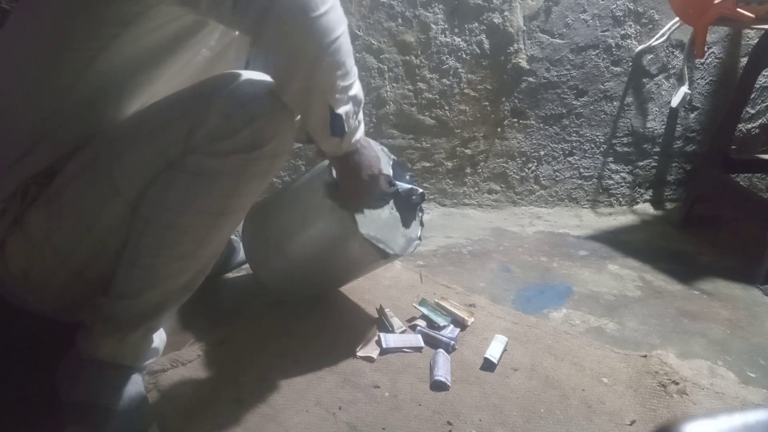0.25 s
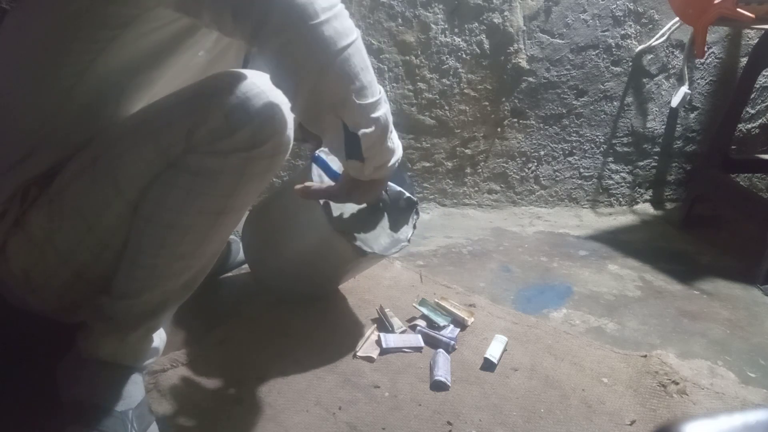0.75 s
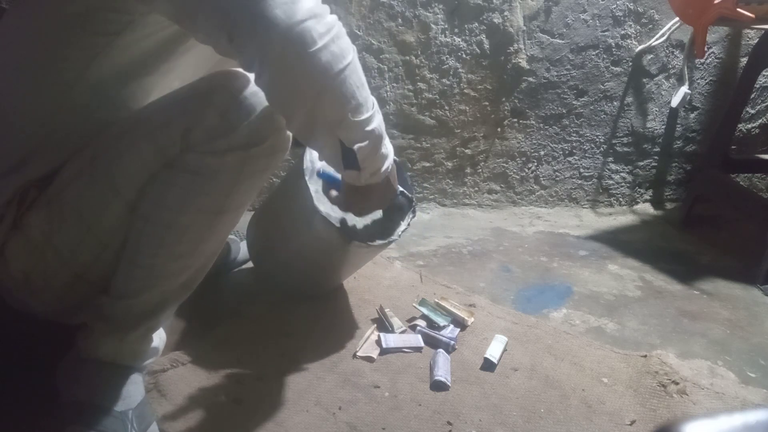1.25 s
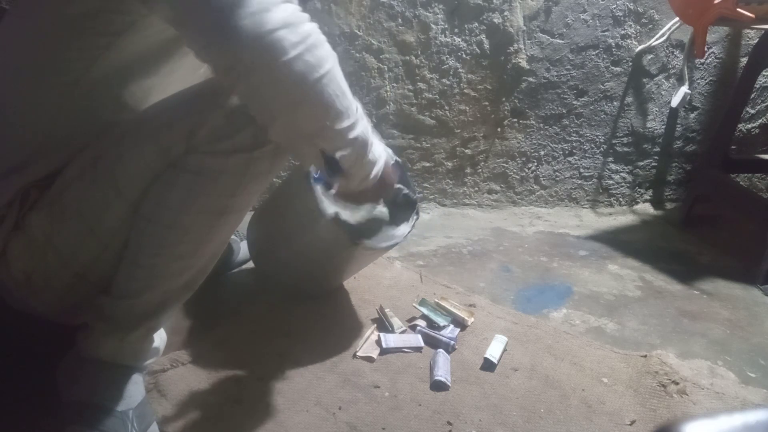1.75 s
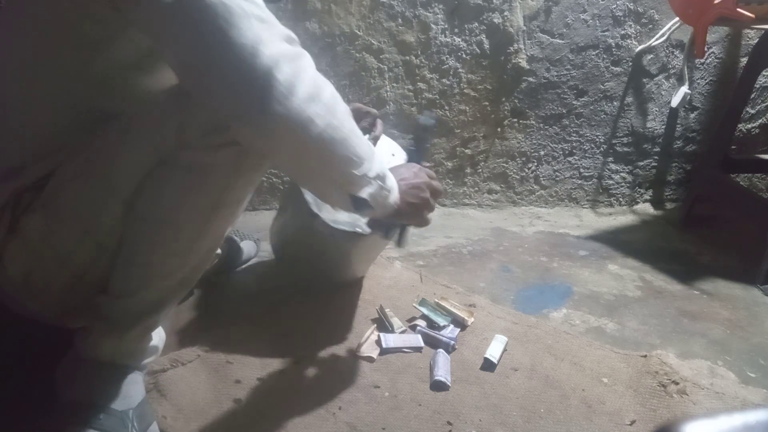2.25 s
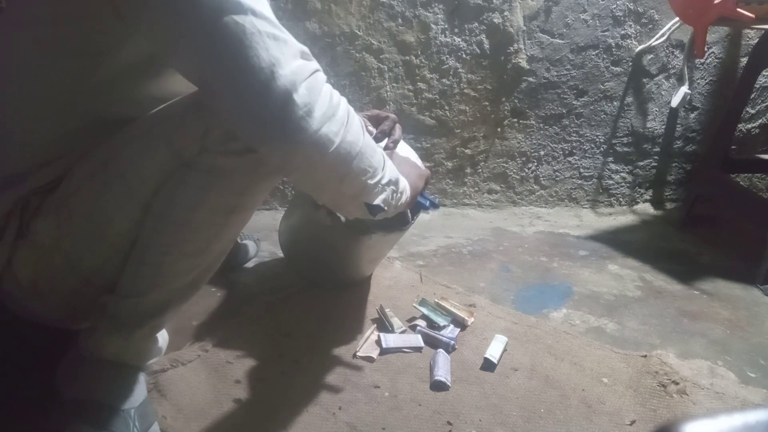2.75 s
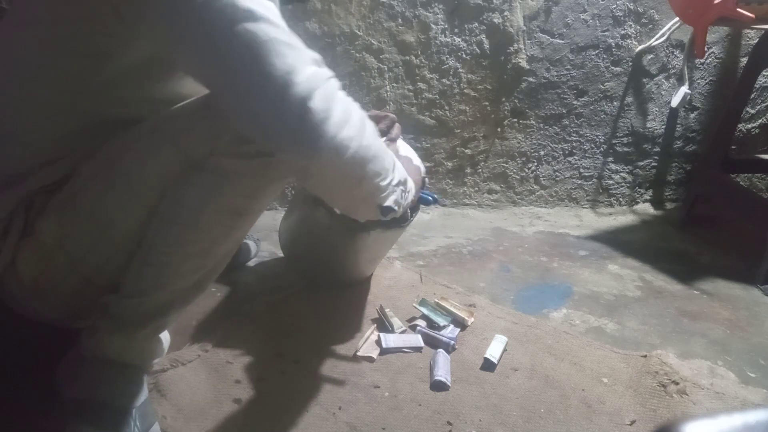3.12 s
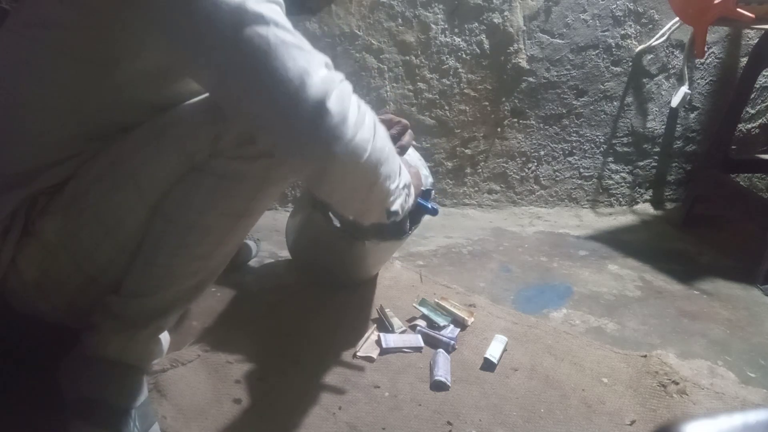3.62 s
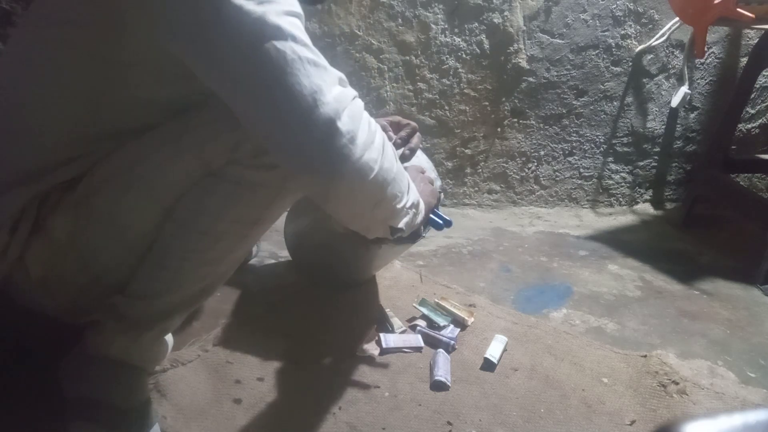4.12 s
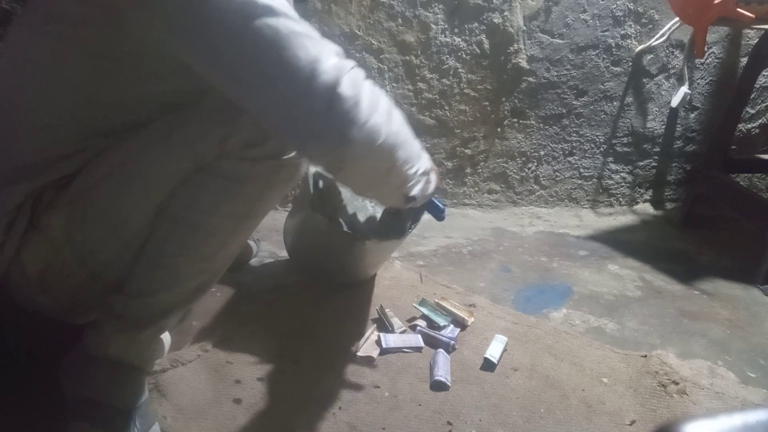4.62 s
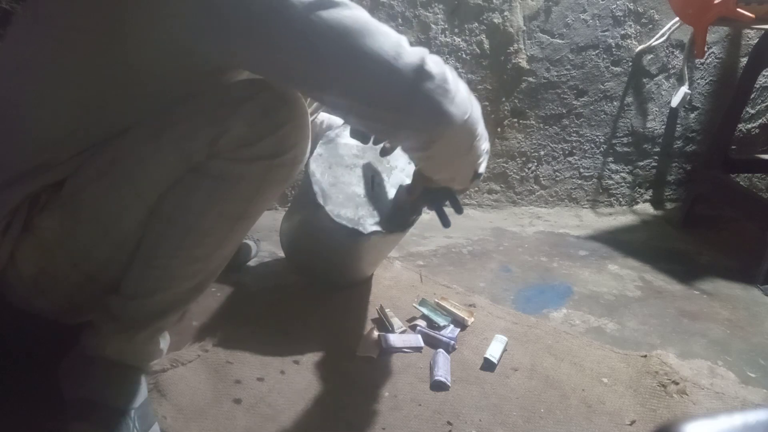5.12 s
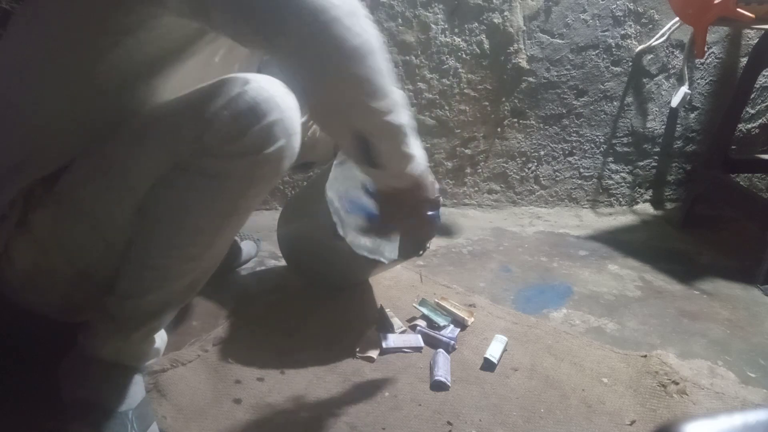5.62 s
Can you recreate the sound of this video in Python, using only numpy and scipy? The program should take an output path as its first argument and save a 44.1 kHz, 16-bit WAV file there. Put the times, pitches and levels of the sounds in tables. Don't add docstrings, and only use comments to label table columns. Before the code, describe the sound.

Close phone capture of a hollow sheet-metal container being worked with a hand tool. Small knocks and tinny ticks come first, then harsh buckling and loud clanking, then long quiet gaps with small scrapes and low thumps. A sudden booming clank arrives late, followed by a few faint knocks. Hard walls reflect at once, and a distant fan rushes softly throughout.

```python
import sys
import numpy as np
from scipy import signal
from scipy.fft import rfft, irfft, next_fast_len
from scipy.io import wavfile
from scipy.ndimage import uniform_filter1d, map_coordinates

SR = 44100
rng = np.random.default_rng(int(sys.argv[2]) if len(sys.argv) > 2 else 0)


def output_pcm(signal):
    pcm = np.clip(np.atleast_2d(signal).T, -1, 1) * 32767
    wavfile.write(sys.argv[1], SR, np.round(pcm).astype(np.int16))


def ratio_of_db(decibels):
    return 10 ** (np.asarray(decibels, float) / 20)


N = 258867


def unit(x):
    return x / np.sqrt(np.mean(x ** 2) + 1e-20)


def along(points, hz):
    f, v = np.transpose(points)
    return np.interp(np.log(hz + 1), np.log(f + 1), v)


def filtered(x, response):
    m = next_fast_len(N + 8192)
    spectrum = rfft(x, m) * response(np.fft.rfftfreq(m, 1 / SR))
    return irfft(spectrum, m)[..., :N]


def wobble(rate):
    knots = rng.standard_normal(N // 500)
    return map_coordinates(knots, [np.arange(N) * rate / SR])


def rings(hz, t60, strengths, cycles):
    t = np.arange(SR // 3) / SR
    hz, t60 = hz[:, None], t60[:, None]
    swell = 1 - np.exp(-t * hz / cycles)
    modes = ratio_of_db(-60 * t / t60) * swell * np.exp(2j * np.pi * hz * t)
    return (strengths @ modes).imag


def chance(events, count, scatter_db):
    draw = rng.standard_normal((events, 2, count))
    return ratio_of_db(scatter_db * draw[:, 0]) * np.exp(4j * draw[:, 1])


def place(times, sounds):
    out = np.zeros(N + SR)
    for s, sound in zip(times, sounds):
        out[round(s * SR):][:len(sound)] += sound
    return out[:N]


def lid_events():
    # start_s, peak_db, bright_db, clank_db, clank_hz
    snaps = np.array([(.526, -42.5, -12.5, 3, 635), (0.6228, -32, -14, -4, 784),
                      (0.6653, -32.5, -17, -9, 1590), (.84, -41.5, -9.5, 10.5, 786),
                      (1.0098, -41.5, -7, -8, 1200), (1.369, -25, -12, 0.5, 810),
                      (1.7474, -25, -14.5, -5.5, 1300), (1.832, -32.5, -9, 13.5, 900),
                      (1.8443, -17.5, -7.5, 4, 950), (1.8942, -21, -21, -15.5, 950),
                      (2.4555, -46.5, -13, 13.5, 1114), (3.2256, -48, -24, 10.5, 620),
                      (3.272, -30.5, -15, 4.5, 693), (3.63, -43.5, -18, -2.5, 750),
                      (3.7224, -52.5, -22, 8.5, 1570), (4.2187, -41, -13, 5, 1104),
                      (4.6678, -29, -18, 12, 834), (4.685, -42.5, -30.5, 17.5, 870),
                      (5.1004, -34, -11, -4, 1130)])
    # start_s, peak_db, clank_db, clank_hz
    bends = np.array([(0.5741, -42.5, -1, 1200), (.64, -33.5, -2.5, 775), (.688, -43, 4, 1550),
                      (.856, -40, 1, 894), (0.8787, -35.5, -16, 830), (1.815, -26, 10.5, 930),
                      (1.059, -40, 0.5, 1200), (1.385, -22.5, 3, 796), (1.43, -23.5, -1.5, 790),
                      (1.4647, -24, -10, 1150), (1.4806, -20.5, -23, 1170), (1.5035, -23.5, -2.5, 990),
                      (1.5233, -28.5, -1, 732), (1.76, -26.5, 4.5, 774), (1.776, -28.5, 5, 910),
                      (1.8599, -14, -3, 950), (2.5598, -42.5, -7, 1170), (2.5876, -52.5, 12, 870),
                      (2.641, -46, 6, 1160), (3.2375, -47.5, 16.5, 640), (3.284, -34, 1, 1510),
                      (3.311, -35, 4, 1520), (3.3279, -36, -9, 760), (3.3608, -50, -2, 662),
                      (3.668, -47, 7, 1710), (4.2496, -44.5, 3, 776), (4.70, -41, 11, 1250),
                      (4.7194, -59, 16, 869), (5.1293, -37, 5, 964), (5.1485, -42, 8, 1187)])
    snap_rise_s, bend_rise_s = 0.0024, 0.0055
    duller_db = -5.5
    before = np.searchsorted(snaps[:, 0], bends[:, 0]) - 1
    bends = np.insert(bends, 2, snaps[before, 2] + duller_db, axis=1)
    rise = np.repeat([snap_rise_s, bend_rise_s], [len(snaps), len(bends)])
    return np.column_stack([np.vstack([snaps, bends]), rise])


def lid():
    # mode_hz, level_db, t60_s
    lid_modes = [(654.5, 5.5, 0.19), (735, 9, 0.066), (771.3, 4.5, 0.13), (858.5, 5.5, 0.17),
                 (936, 1, 0.24), (990, -2, 0.17), (990, -18.5, 0.065), (1172, -10, 0.15),
                 (1260, -0.5, 0.067), (1212, 8.5, 0.072), (1342, 11, 0.23), (1355, 8, 0.061),
                 (1510, 0.5, 0.21), (1544, 13, 0.047), (1734, -1, 0.15), (1782, -6.5, 0.13),
                 (1810, -22.5, 0.12), (1980, -17, .14), (2305, -28.5, .14), (2800, -6, .12)]
    # hz, level_db
    sheet_colour = [(100, -29), (300, -3), (550, -5), (800, 1), (1200, 2), (2000, -4.5), (3000, -0.5),
                    (4500, 0), (6500, 1), (8500, -3), (12000, -30)]
    # hz, t60_s
    sheet_decay = [(500, 0.14), (2000, 0.17), (4000, 0.15), (8000, 0.093)]
    s, db, bright_db, clank_db, clank_hz, rise = np.transpose(lid_events())[:, :, None]

    hz, level, t60 = np.transpose(lid_modes)
    near = np.exp(-.5 * (np.log2(hz / clank_hz) / 0.1) ** 2) + 0.15
    strengths = ratio_of_db(clank_db + level - 4.0) * near
    strengths = strengths * chance(len(s), count=len(hz), scatter_db=2.0)
    clank = rings(hz, np.minimum(t60, .15), strengths, cycles=0.89)

    f, frame, z = signal.stft(rng.standard_normal(clank.shape), SR, nperseg=512)
    tilt_octaves = np.log2(np.maximum(f, 2000) / 2800)
    colour_db = along(sheet_colour, f) + (bright_db + 4.5) * tilt_octaves
    colour_db += 0.54 * clank_db / (1 + (f / 1800) ** 4)
    streaks_db = 1.43 * rng.standard_normal(colour_db.shape)
    dying = ratio_of_db(-60 * frame / along(sheet_decay, f)[:, None])
    z = z * ratio_of_db(colour_db + streaks_db)[:, :, None] * dying
    crash = signal.istft(z, SR, nperseg=512)[1][:, :clank.shape[1]]

    t = np.arange(clank.shape[1]) / SR
    swell = 1 - np.exp(-t / rise)
    rattle = ratio_of_db(1.2 * wobble(120))
    return rattle * place(s[:, 0], ratio_of_db(db) * swell * (clank + ratio_of_db(6.0) * crash))


def body_events():
    # start_s, peak_db, wall_hz
    taps = [(0.173, -28, 360), (0.245, -28.5, 353), (0.534, -25.5, 395), (0.572, -27.5, 440),
            (0.632, -27.5, 300), (0.685, -35, 324), (0.766, -22.5, 308), (0.801, -22.5, 363),
            (0.846, -21, 352), (0.879, -27, 360), (1.057, -30.5, 298), (1.371, -11.5, 310),
            (1.483, -14.5, 310), (1.40, -32, 324), (1.504, -18, 306), (1.52, -19, 352), (1.756, -17.5, 308),
            (1.8, -16, 315), (2.478, -36.5, 390), (2.556, -35, 370), (2.59, -29.5, 317), (2.63, -37, 320),
            (3.636, -29.5, 288), (4.233, -28, 293), (4.665, -14, 374), (4.669, -6, 270), (4.70, -15, 228)]
    # start_s, peak_db, belly_db, drum_db, thud_db
    shoves = [(0.208, -25.5, -9.5, -18.5, -16), (0.862, -35.5, -7, -2, -13), (1.431, -18, -18.5, -9, -15),
              (1.461, -19, -25, -5.5, -34), (1.845, -13, -15, -18.5, -24), (1.89, -23, 3.5, -44, -21),
              (3.235, -37, -3, 3.5, 10.5), (3.276, -21, 4.5, -9, -9), (3.325, -27.5, 6, -28, -7.5),
              (3.718, -44, 3.5, -22, -22), (3.914, -41, -3, -8, 10), (4.05, -44.5, -4, 1, 7),
              (4.217, -21.5, -9, -5.5, -22), (4.253, -24.5, -19.5, -20.5, -18), (4.663, -21.5, 4.5, 8, 4.5),
              (4.685, -20.5, 0, -4.5, 0), (4.718, -47, 5, -1, -12), (5.102, -33.5, 3.5, -3.5, 0),
              (5.145, -36, -5, 2, -16), (5.4, -39, -14, -9, -2)]
    shove_wall_hz = 309
    knocks = [(*tap, -16, -20, -20.5) for tap in taps]
    return knocks + [(s, db, shove_wall_hz, *low) for s, db, *low in shoves]


def body():
    # mode_hz, level_db, t60_s
    body_modes = [(144.2, -1, 0.21), (192.9, 6.5, 0.3), (262.3, 4, 0.33), (228.5, -1, 0.23),
                  (295.8, -6, 0.14), (314.7, -3.5, 0.18), (357.4, -2, 0.18), (386, 0, 0.076),
                  (447.7, -5, 0.28), (514, 0, 0.078)]
    s, db, pitch_hz, belly_db, drum_db, thud_db = np.transpose(body_events())[:, :, None]
    hz, level, t60 = np.transpose(body_modes)
    wall = np.exp(-.5 * (np.log2(hz[3:] / pitch_hz) / 0.17) ** 2) + 0.21
    share = np.hstack([ratio_of_db(thud_db), ratio_of_db(drum_db), ratio_of_db(belly_db), wall])
    strengths = ratio_of_db(db + level - 3) * share
    strengths = strengths * chance(len(s), count=len(hz), scatter_db=0.47)
    knocks = place(s[:, 0], rings(hz, t60, strengths, cycles=1.08))
    grip = ratio_of_db(.8 * wobble(45))
    return grip * knocks + floor_boom()


def floor_boom():
    # level_db, t60_s
    rocking = (-42.5, 1.3)
    boom_db, boom_t60 = rocking
    start_s, boom_hz, swell_s = 1.875, 86, 0.059
    t = np.clip(np.arange(N) / SR - start_s, 0, None)
    swell = 1 - np.exp(-t / swell_s)
    return ratio_of_db(boom_db - 60 * t / boom_t60) * swell * np.sin(2 * np.pi * boom_hz * t)


def walls(x):
    # hz, t60_s
    room_decay = [(150, 0.47), (600, 0.25), (2500, 0.088), (8000, 0.13)]
    # delay_s, level_db
    far_wall = (.045, -12)
    hz, t, z = signal.stft(rng.standard_normal((2, SR // 2)), SR, nperseg=256)
    dying = ratio_of_db(-60 * t / along(room_decay, hz)[:, None])
    near, far = signal.istft(z * dying, SR, nperseg=256)[1]
    late_s, far_db = far_wall
    tail = near + ratio_of_db(far_db) * np.pad(far, (round(late_s * SR), 0))[:len(far)]
    delayed = np.pad(x, (260, 0))
    return signal.fftconvolve(delayed, tail / np.linalg.norm(near))[:N]


def rush(spectrum, patchy_db):
    z = signal.stft(rng.standard_normal(N), nperseg=512)[2]
    field = uniform_filter1d(rng.standard_normal(z.shape), 5, 0)
    field = uniform_filter1d(field, 12, 1)
    noise = signal.istft(z * ratio_of_db(patchy_db * unit(field)), nperseg=512)[1][:N]
    return unit(filtered(noise, lambda hz: ratio_of_db(along(spectrum, hz))))


def fan(can):
    # hz, level_db
    rumble_colour = [(25, -34), (60, -14), (95, -9.5), (135, 5), (200, -1), (260, -26), (400, -45.5),
                     (800, -120)]
    # hz, level_db
    rush_colour = [(60, -66.5), (160, -9), (300, 0.5), (500, -8.5), (800, -8), (1200, -5), (1550, -8),
                   (2000, -17), (3500, -21.5), (6500, -25), (9000, -40.5), (20000, -22.5)]
    # time_s, level_db
    rush_level = [(0.0, -57), (0.29, -57), (0.6, -56), (0.75, -54.5), (1.19, -57.5), (1.85, -55.5),
                  (3.02, -57), (3.96, -56), (4.48, -56.5), (5.41, -56), (5.87, -56)]
    # pitch_hz, level_db
    tone_table = [(301.5, -57.5), (344.5, -56.5), (414.5, -58.5), (506.0, -57), (554.5, -59.5),
                  (624.5, -60), (699.8, -58), (1001, -61.5), (1200, -56.5), (1303, -64)]
    t = np.arange(N) / SR
    linger_s, floor_shake_db, scrape_db = 0.051, -24, -31
    effort = uniform_filter1d(np.abs(can), round(linger_s * SR))

    rumble_gain = ratio_of_db(-58 + wobble(2.8)) + ratio_of_db(floor_shake_db) * effort
    lumps = ratio_of_db(1.5 * wobble(14))
    rumble = rumble_gain * lumps * rush(rumble_colour, patchy_db=2.5)

    air_db = np.interp(t, *np.transpose(rush_level)) + 12.5 + 0.14 * wobble(4.2)
    air_gain = ratio_of_db(air_db) + ratio_of_db(scrape_db) * effort
    air = air_gain * rush(rush_colour, patchy_db=1.33)

    tones = np.zeros(N)
    for hz, db in tone_table:
        level = ratio_of_db(db + 3.0 + 3.0 * wobble(25))
        tones += level * np.sin(2 * np.pi * hz * t + 0.99 * wobble(20))
    return rumble + air + tones


def scene():
    sheet, drum = lid(), body()
    can = sheet + drum
    answer = walls(ratio_of_db(-2.0) * sheet + ratio_of_db(-15) * drum)
    return (can + answer + fan(can))[None]


def low_pass(x):
    return signal.sosfilt(signal.butter(12, 8390, fs=SR, output="sos"), x)


def record(dry):
    # hz, gain_db
    upper_edge = [(20, -1.5), (6600, -2), (7400, -5), (7900, -16.5), (8350, -32.5), (8500, -85.5),
                  (20000, -120)]
    lean = signal.sosfilt(signal.butter(2, 90, "high", fs=SR, output="sos"), dry)
    ceiling = .62
    lean = lean / (1 + np.abs(lean / ceiling) ** 4) ** .25
    mix = filtered(lean, lambda hz: ratio_of_db(along(upper_edge, hz)))
    return low_pass(mix)


dry = scene()
out = record(dry)
output_pcm(out)
```